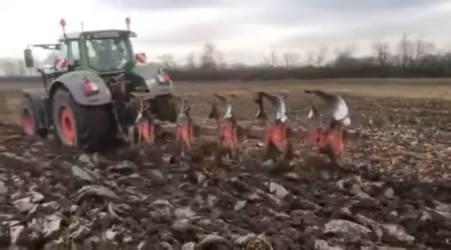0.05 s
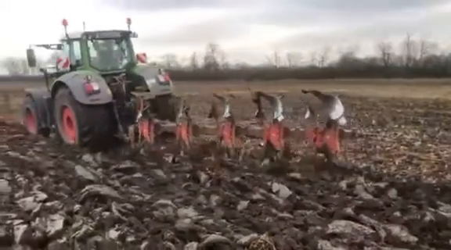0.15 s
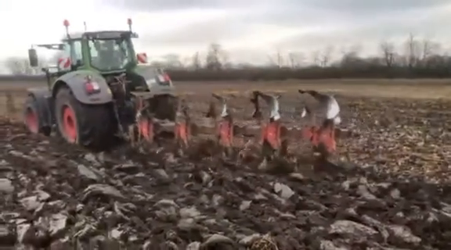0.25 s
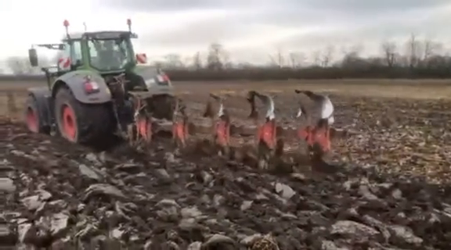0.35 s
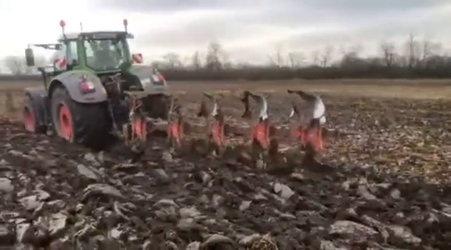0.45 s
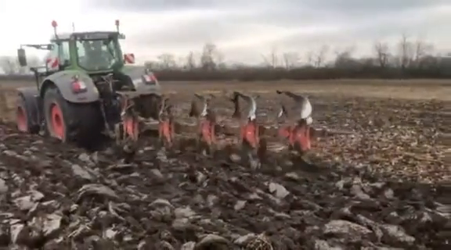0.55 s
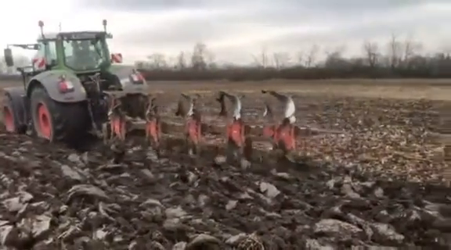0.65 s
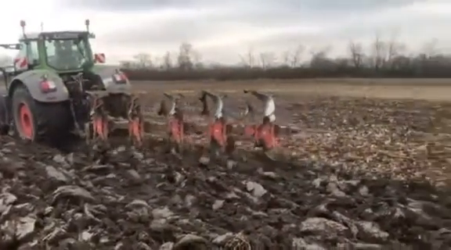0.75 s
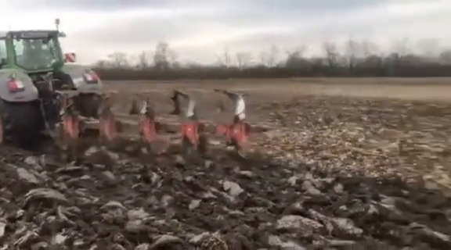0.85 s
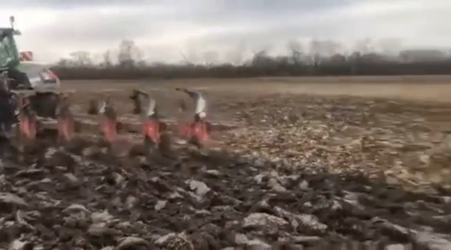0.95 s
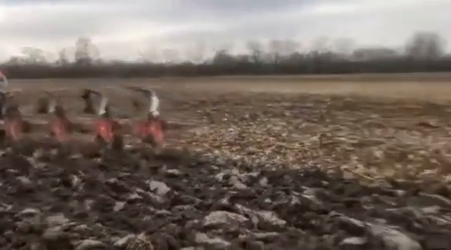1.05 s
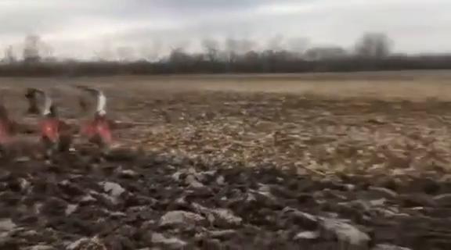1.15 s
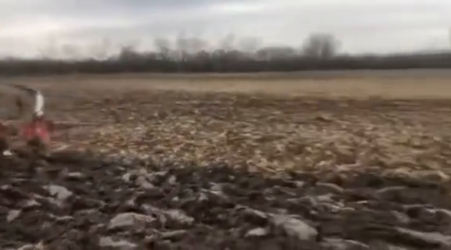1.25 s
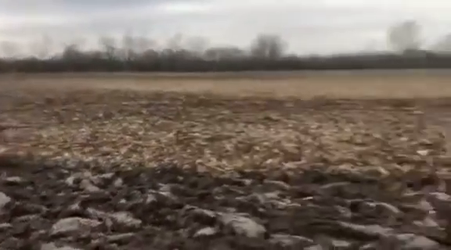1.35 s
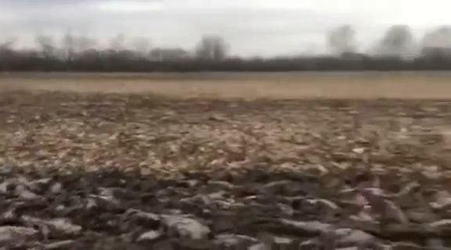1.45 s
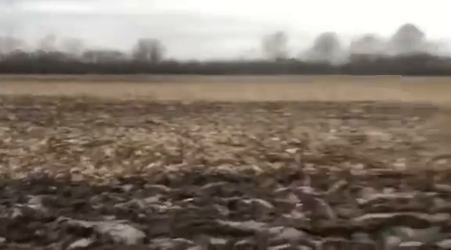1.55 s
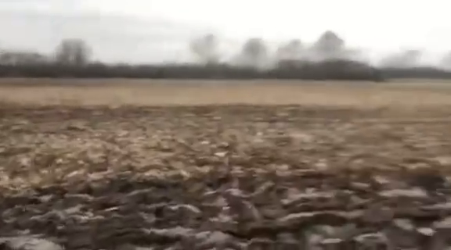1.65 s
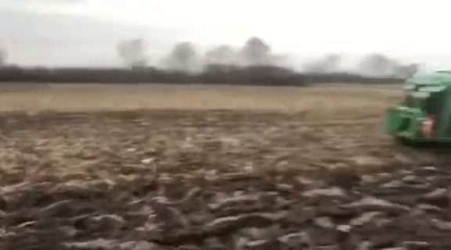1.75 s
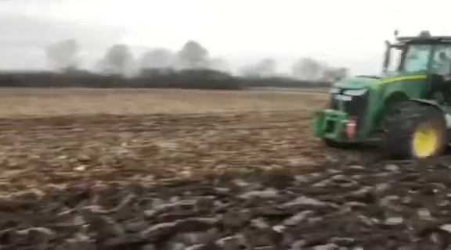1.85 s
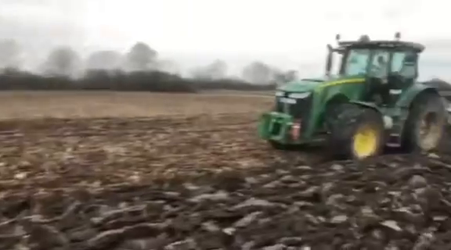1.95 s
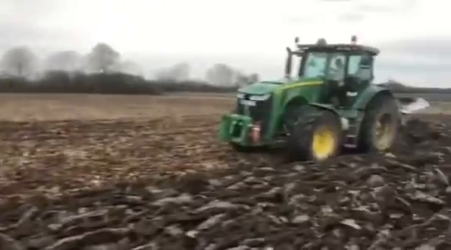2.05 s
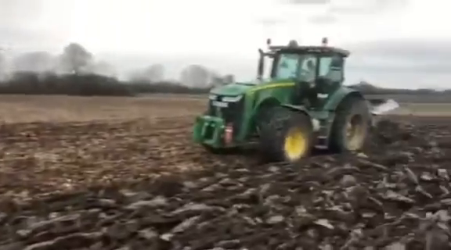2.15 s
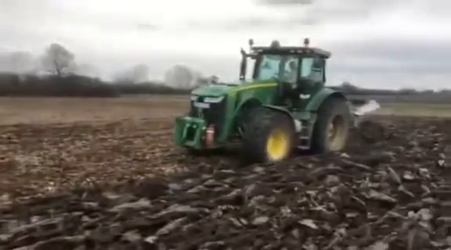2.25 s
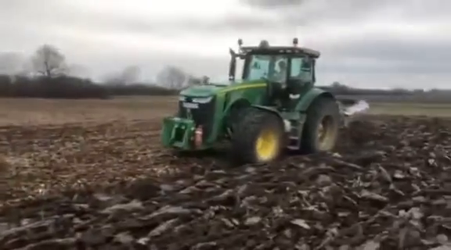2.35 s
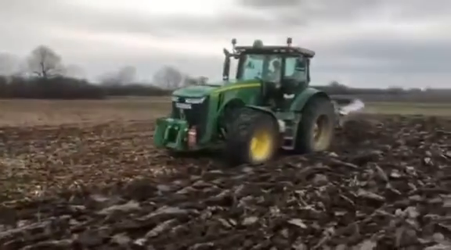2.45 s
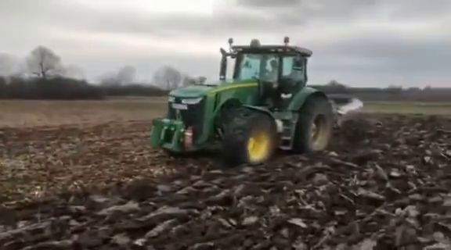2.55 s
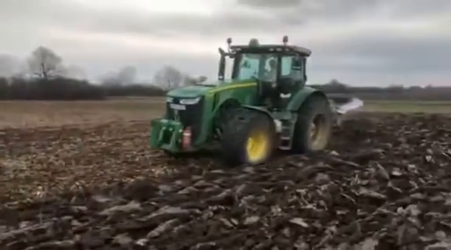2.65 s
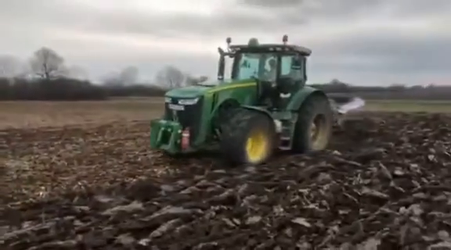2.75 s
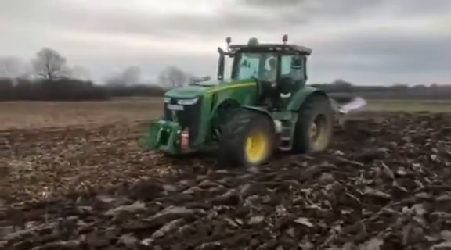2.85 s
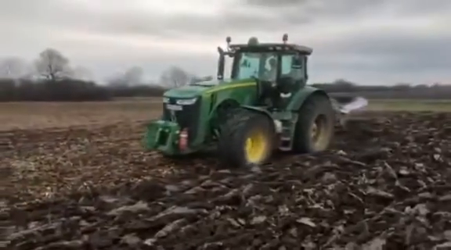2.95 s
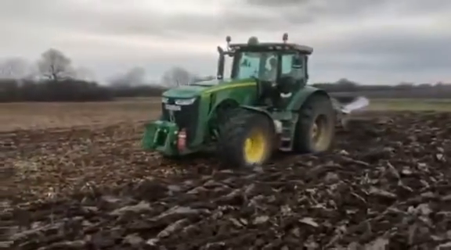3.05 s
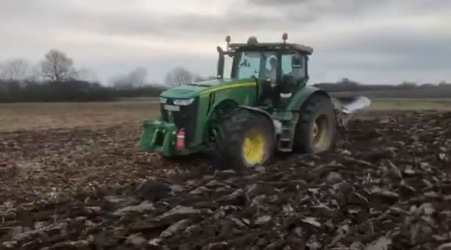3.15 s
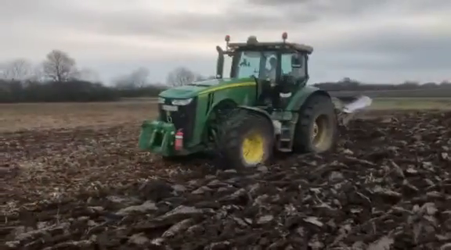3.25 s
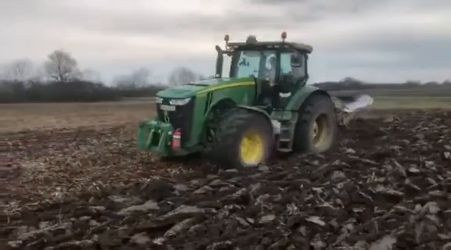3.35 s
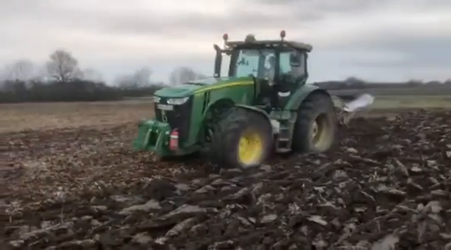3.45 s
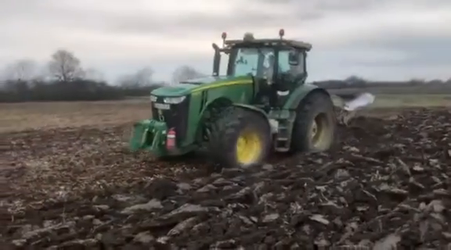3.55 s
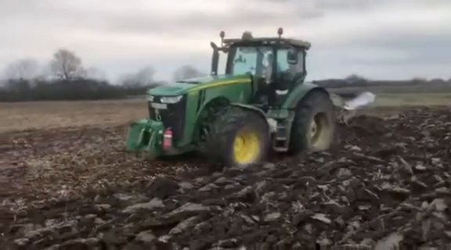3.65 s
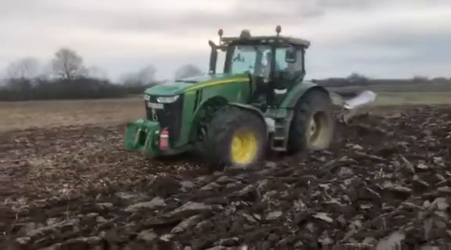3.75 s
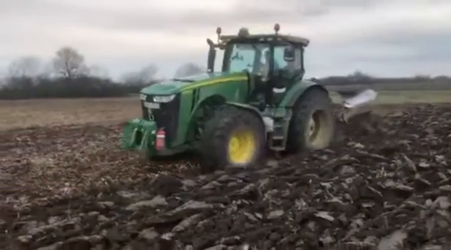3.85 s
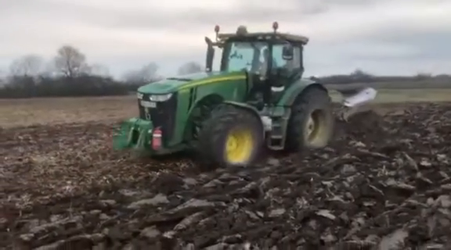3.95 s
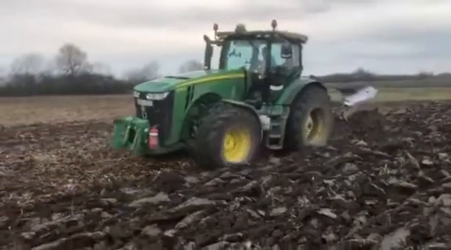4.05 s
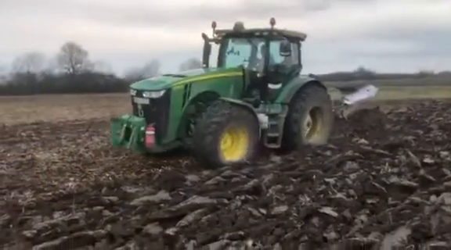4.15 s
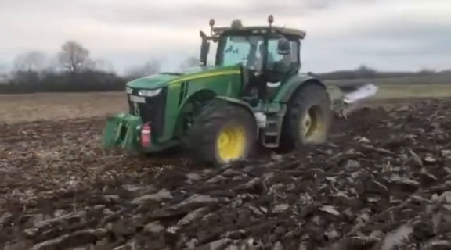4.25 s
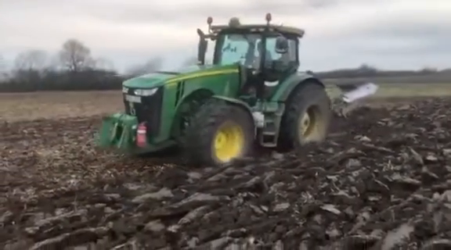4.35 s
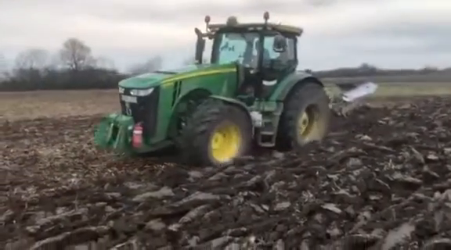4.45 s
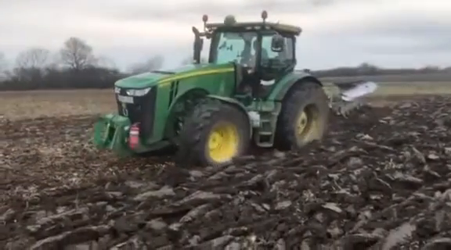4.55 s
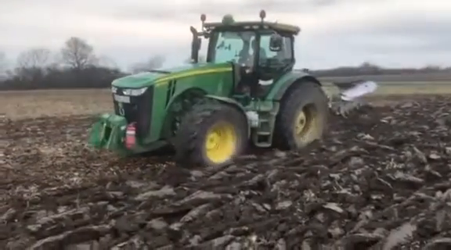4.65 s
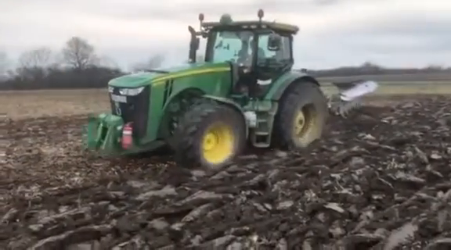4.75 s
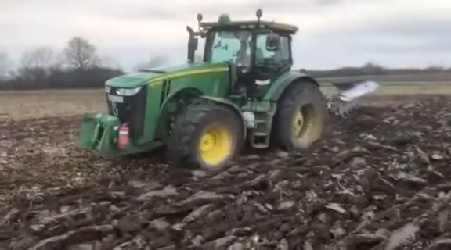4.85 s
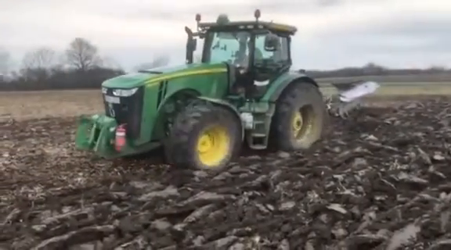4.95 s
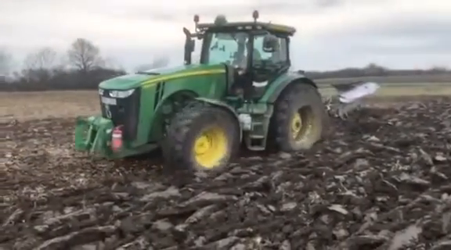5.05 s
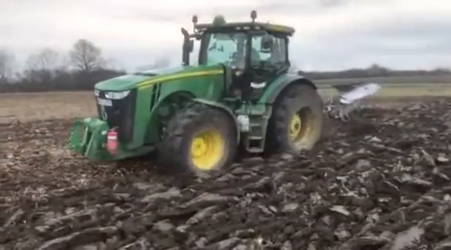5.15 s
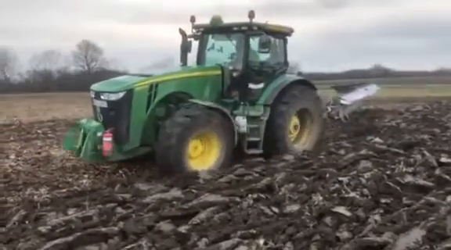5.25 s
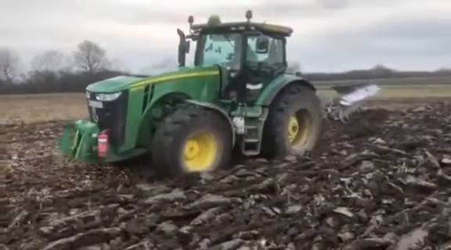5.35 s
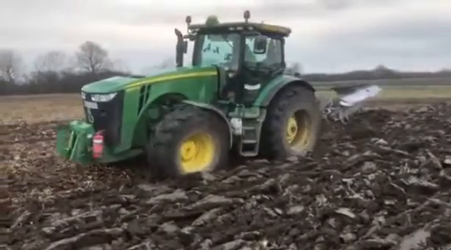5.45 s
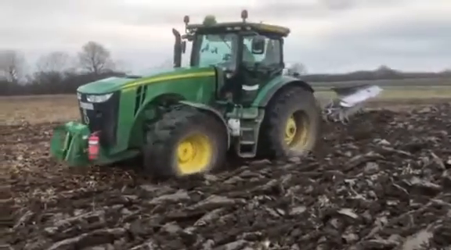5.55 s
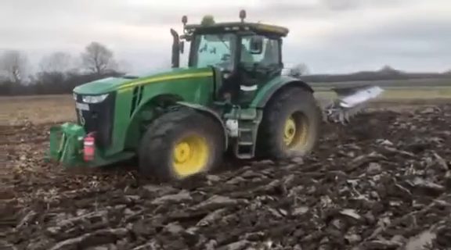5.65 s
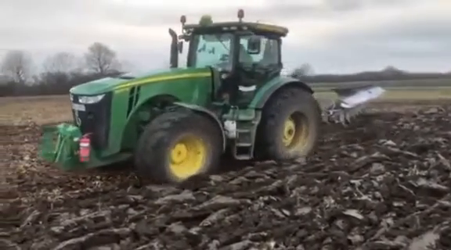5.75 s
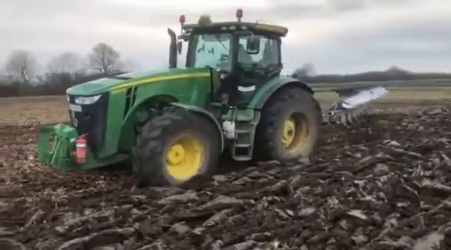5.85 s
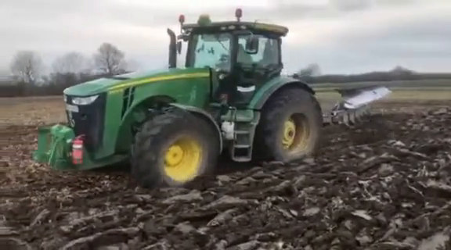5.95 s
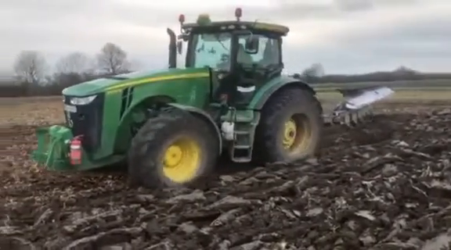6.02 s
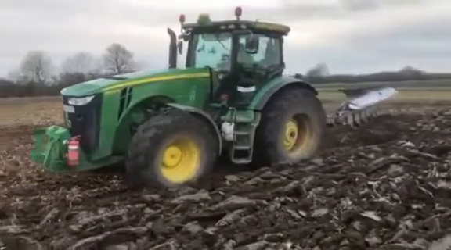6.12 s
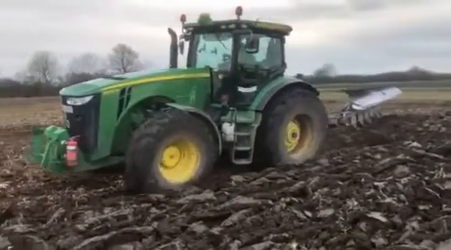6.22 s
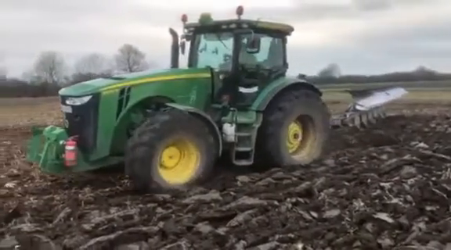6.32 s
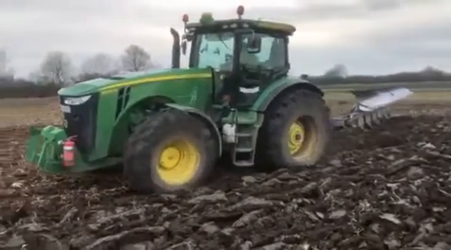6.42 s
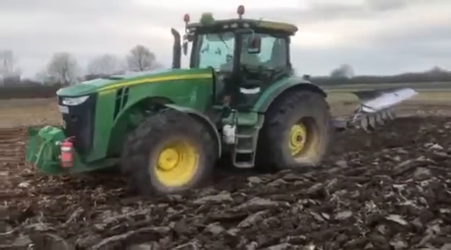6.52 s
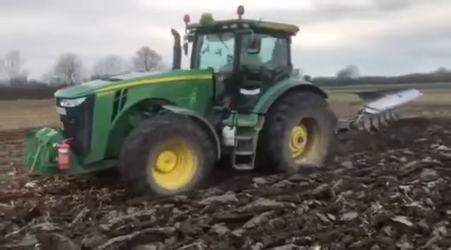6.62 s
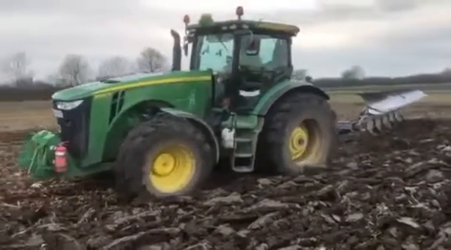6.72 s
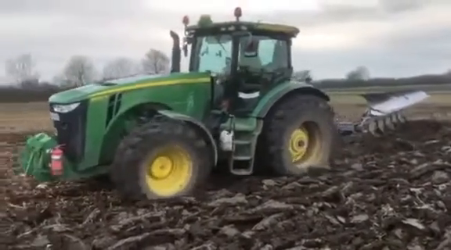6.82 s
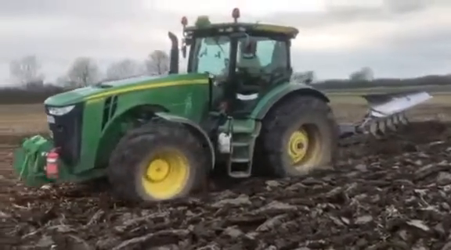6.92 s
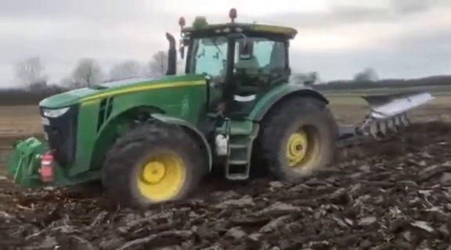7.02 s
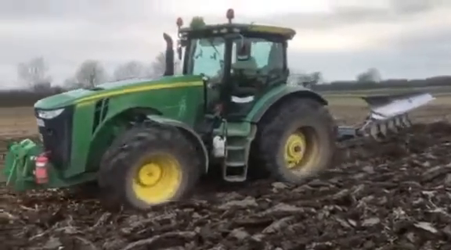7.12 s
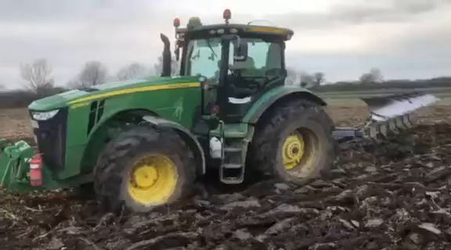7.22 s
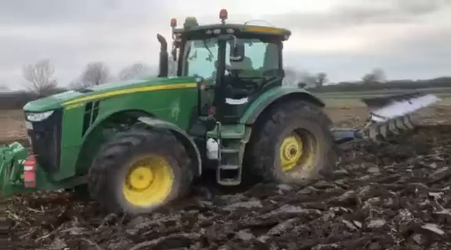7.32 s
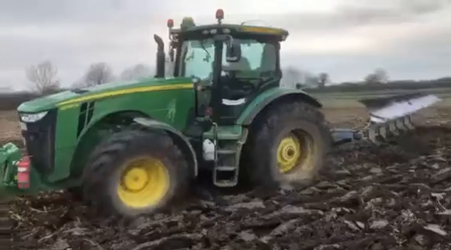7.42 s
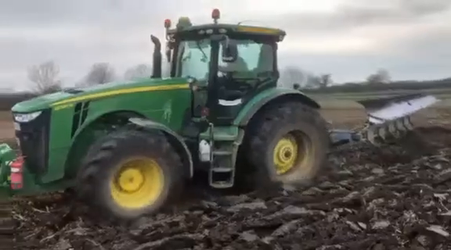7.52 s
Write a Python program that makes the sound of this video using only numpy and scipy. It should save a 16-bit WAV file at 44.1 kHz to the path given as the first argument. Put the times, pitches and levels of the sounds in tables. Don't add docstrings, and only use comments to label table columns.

```python
import sys
import numpy as np
from scipy import signal
from scipy.fft import rfft, irfft, next_fast_len
from scipy.io import wavfile
from scipy.ndimage import uniform_filter1d

SR = 44100
rng = np.random.default_rng(int(sys.argv[2]) if len(sys.argv) > 2 else 0)


def persist_wave(psi):
    counts = np.round(np.clip(psi, -1, 1) * 32767).astype(np.int16)
    wavfile.write(sys.argv[1], SR, np.atleast_2d(counts).T)


def volts_from_db(level):
    exponent = np.asarray(level, float) / 20
    return 10 ** exponent


N = 334278
TIME = np.arange(N) / SR


def curves(table):
    t, *columns = np.transpose(table)
    return [np.interp(TIME, t, c) for c in columns]


def walk(rate_hz):
    k = int(SR / rate_hz)
    held = np.repeat(rng.standard_normal(N // k + 1), k)
    return 1.16 * uniform_filter1d(uniform_filter1d(held, k), k)[:N]


def turns(hz):
    return np.cumsum(hz) / SR


def tone(revs, wander_db, rate_hz):
    return np.sqrt(2) * np.sin(2 * np.pi * (revs + rng.random())) * volts_from_db(wander_db * walk(rate_hz))


def swells(rows):
    return np.sqrt(sum(volts_from_db(2 * db) * np.exp(-((TIME - t) / half_s) ** 2) for t, half_s, db in rows))


def noise(spectrum, drift_db, count, peaks=()):
    hz, db = np.transpose(spectrum)
    size = next_fast_len(N)
    every_hz = np.maximum(np.fft.rfftfreq(size, 1 / SR), 1)
    place = np.log(every_hz)
    colour_db = np.interp(place, np.log(hz), db, -120, -120)
    for f, width_hz, peak_db in peaks:
        colour_db += peak_db / (1 + (2 * (every_hz - f) / width_hz) ** 2)
    shaped = rfft(rng.standard_normal(size)) * volts_from_db(colour_db)
    centres = np.linspace(np.log(hz[1]), np.log(hz[-3]), count)
    out = np.zeros(N)
    for one in np.eye(count):
        part = irfft(shaped * np.interp(place, centres, one), size)[:N]
        out += part * volts_from_db(drift_db * walk(1.587))
    return out / np.std(out)


# multiple of its shaft rate, level/dB
FAR_ORDERS = [(1.5, -45), (2, -44), (3, -47.5), (6, -42), (7, -52), (8, -50), (38, -51.5), (45.5, -56.5)]
# t/s, f/Hz, level/dB
FAR_FADE = [(0, 41.46, -2), (1.5, 40.82, -1), (3, 40.83, -4), (7.58, 40.7, -7.5)]


def far_tractor():
    hz, db = curves(FAR_FADE)
    return volts_from_db(db) * sum(volts_from_db(d) * tone(k * turns(hz), 1.4, 4) for k, d in FAR_ORDERS)


# f/Hz, level/dB per Hz
RUMBLE = [(12, -59.5), (20, -37.5), (70, -5), (113, -8), (135, -5), (180, -25), (300, -120)]


def ground_rumble():
    return volts_from_db(-40.5) * noise(RUMBLE, 1.2, count=4)


# t/s, f/Hz, level/dB
HUM = [(0.0, 145.7, -37), (0.06, 146.7, -32), (0.74, 144.7, -36.5), (1.35, 144.6, -35.5),
       (1.83, 148.9, -29), (2.49, 148.9, -27.5), (2.7, 146.5, -32.5), (2.83, 141.9, -34.5),
       (3.34, 142.0, -33.5), (3.46, 146.2, -31.5), (3.74, 157.0, -22), (4.41, 154.3, -24),
       (4.71, 146.8, -28), (5.25, 151.2, -25.5), (5.87, 151.7, -24.5), (6.33, 148.5, -27),
       (7.01, 150.4, -24), (7.58, 148.6, -22.5)]


def drive_hum():
    hz, db = curves(HUM)
    octave_db = -41 + 1.14 * (db + 25) + 0.6 * (hz - 150.7)
    hum = volts_from_db(db) * tone(turns(hz) + 0.017 * walk(25), 1.3, 10)
    return hum + volts_from_db(octave_db) * tone(2 * turns(hz), 2.2, 12)


# t/s, f/Hz
CRANK = [(0, 503.8), (3.3, 503.5), (3.8, 510.7), (6.0, 509.2), (6.8, 503.2), (7.1, 507.7), (7.58, 505.5)]


def crank_teeth():
    return turns(curves(CRANK)[0])


def engine_cycle():
    return crank_teeth() / 32.7


def facing():
    start_s, takes_s = 0.85, 0.75
    return np.sin(np.pi / 2 * np.clip((TIME - start_s) / takes_s, 0, 1)) ** 2


def turning(ahead, behind):
    return np.sqrt(facing()) * ahead + np.sqrt(1 - facing()) * behind


# t/s, level/dB
NEAR = [(0, -34.5), (.8, -33), (1.35, -31.5), (1.9, -28), (2.45, -26), (2.68, -26.5), (2.8, -29),
        (3.4, -28.5), (3.75, -27.5), (4.35, -26), (4.85, -27.5), (5.6, -26), (6.45, -26), (6.75, -25.5),
        (7.58, -25.5)]


def layer_db(mix):
    close_db, slope, behind_db = mix
    nearness_db = curves(NEAR)[0] + 26
    return close_db + slope * nearness_db + behind_db * (1 - facing())


CYLINDERS = np.array([1, -8.0, -4, -8.5, -5.5, -9])


def knock(depth, lag):
    firing = len(CYLINDERS) * (engine_cycle() + lag)
    k = firing.astype(int)
    luck_db = 4.3 * rng.standard_normal(k[-1] + 1)[k]
    size = volts_from_db(np.take(CYLINDERS, k % len(CYLINDERS)) + luck_db)
    gate = 1 + depth * size * np.exp(-(firing - k) / 1.3)
    return gate / np.sqrt(np.mean(gate ** 2))


# close level/dB, dB per dB of nearness, dB behind the phone
GEAR_MIX = (-39.5, 0.25, 0)


def crank_gear():
    return volts_from_db(layer_db(GEAR_MIX)) * tone(crank_teeth(), 2.4, 12)


# f/Hz, level/dB per Hz
BOOM = [(100, -38), (175, -3.5), (212, 0), (243, -11), (296, -6.5), (330, -15), (430, -39), (730, -120)]
# close level/dB, dB per dB of nearness, dB behind the phone
BOOM_MIX = (-33, 0.55, 0)


def boom():
    return volts_from_db(layer_db(BOOM_MIX) + 1.6 * walk(9)) * noise(BOOM, 0.9, count=4)


# f/Hz, level/dB per Hz
ROAR_BEHIND = [(190, -31), (320, -2.5), (440, -2.5), (540, -1.5), (640, -5), (780, -2.5), (1020, -5.5),
               (1350, -11), (1760, -37), (2970, -120)]
# f/Hz, level/dB per Hz
ROAR = [(190, -36), (320, -4.5), (415, -6), (454, -7), (471, -5), (509, -4), (537, -5.5), (675, -1.5),
        (1040, -4.5), (1200, -6.5), (1350, -15), (1760, -38), (2970, -120)]
# multiple of the four-stroke cycle, level/dB under the roar
ORDERS = [(3, -26), (6, -20), (11.04, -8), (11.99, -15), (14.96, -17), (24.05, -18), (50.9, -14),
          (56.4, -16.5), (69.3, -21), (73.3, -21), (58.47, -16.5), (28.88, -20.5), (37.13, -19.5)]
# close level/dB, dB per dB of nearness, dB behind the phone
ROAR_MIX = (-27.5, .8, 0)


def roar():
    cycle = engine_cycle()
    orders = sum(volts_from_db(db) * tone(k * (cycle + 0.003 * walk(6)), 1.5 + 0.016 * k, 9) for k, db in ORDERS)
    rough = turning(noise(ROAR, 1.0, count=8), noise(ROAR_BEHIND, 0.53, count=3))
    rough = volts_from_db(-1.0) * rough * knock(0.4, 0.1)
    return volts_from_db(layer_db(ROAR_MIX)) * (orders * np.sqrt(facing()) + rough)


# f/Hz, level/dB per Hz
CLATTER_BEHIND = [(760, -43), (1300, -10.5), (1550, -1.5), (1970, -7), (2220, -3), (2520, -8),
                  (2600, -10.5), (3300, -18), (4290, -52), (7260, -120)]
# f/Hz, level/dB per Hz
CLATTER = [(760, -24), (1300, -1), (1800, -1), (2200, -3), (2440, -4), (2940, -7.5), (3300, -12),
           (4290, -31), (7260, -120)]
# f/Hz, width/Hz, level/dB
CLATTER_PEAKS = [(1557, 90, 4), (1857, 83, 2.5), (2435, 130, 3), (2166, 97, -2)]
# close level/dB, dB per dB of nearness, dB behind the phone
CLATTER_MIX = (-32, 0.95, 0)


def clatter():
    strain_s, strain_half_s, strain_db = 2.56, 0.17, 2.0
    db = layer_db(CLATTER_MIX) + strain_db * np.exp(-((TIME - strain_s) / strain_half_s) ** 4)
    ahead = noise(CLATTER, 1.34, count=9, peaks=CLATTER_PEAKS)
    return volts_from_db(db) * turning(ahead, noise(CLATTER_BEHIND, 1.3, count=4)) * knock(0.34, 0.4)


# f/Hz, level/dB per Hz
HISS_BEHIND = [(1880, -35.5), (3200, -7), (3730, -6), (4060, -1), (4210, -4.5), (4800, -5.5), (5760, -5),
               (6140, -9), (7400, -12.5), (8260, -14), (8800, -16), (11400, -43), (19400, -120)]
# f/Hz, level/dB per Hz
HISS = [(1880, -34), (3200, -6.5), (4140, -3.5), (4530, -1), (5180, -2.5), (5670, 1), (8050, -6.5),
        (8800, -7.5), (11400, -38.5), (19400, -120)]
# f/Hz, width/Hz, level/dB
HISS_PEAKS = [(4560, 87, 2), (5615, 310, 2), (6070, 300, -2)]
# close level/dB, dB per dB of nearness, dB behind the phone
HISS_MIX = (-30, 0.92, -6)


def air_hiss():
    ahead = noise(HISS, 0.69, count=10, peaks=HISS_PEAKS)
    hiss = turning(ahead, noise(HISS_BEHIND, 0.45, count=4))
    return volts_from_db(layer_db(HISS_MIX)) * hiss * knock(0.22, 0.7)


# middle t/s, half length/s, level/dB
WHISTLE = [(1.3, .45, -60)]


def turbo_whistle():
    return swells(WHISTLE) * tone(7060 * TIME, 2.0, 13)


# t/s, peak level/dB, f/Hz
THUDS = [
    (1.247, -24.5, 231),
    (1.879, -34.5, 188),
    (2.699, -28, 213.4),
    (4.127, -27, 203.5),
    (4.379, -24, 179.9),
    (5.079, -33, 179.4),
    (5.498, -23.5, 191.5),
]


def clods():
    out = np.zeros(N)
    for t, db, hz in THUDS:
        bump = np.exp(-((TIME - t - 0.04) / 0.023) ** 2)
        out += volts_from_db(db) * bump * np.sin(2 * np.pi * hz * TIME)
    return out


# t/s, upper mesh f/Hz
GEARBOX = [(0, 1184), (2, 1225), (3.2, 1196), (3.75, 1246), (4.4, 1218), (4.72, 1168), (5, 1201),
           (5.6, 1235), (6.2, 1199), (6.6, 1203), (7.15, 1217), (7.58, 1176)]
# t/s, lower mesh f/Hz
AXLE = [(0, 672), (3.3, 668.7), (3.75, 687), (4.1, 679.5), (4.45, 676), (4.56, 650), (5.0, 672.7),
        (5.8, 680), (6.2, 670), (7.2, 674.3), (7.58, 656)]
MESH_RATIO = 1, .802, 1, 1.106
# middle t/s, half length/s, level/dB
WHINES = [
    [(3.85, 0.13, -34.5), (4.4, .35, -37), (5.6, 0.24, -39), (6.5, .4, -39), (7.2, .25, -40)],
    [(4.3, 0.21, -43), (5.45, .4, -38), (7.1, .5, -46)],
    [(2.1, 0.36, -43), (3.75, 0.16, -34), (4.28, .18, -34), (4.82, .24, -32), (5.9, .15, -35.5),
     (6.8, 0.28, -36), (7.35, 0.23, -30.5)],
    [(1.8, 0.46, -41), (3.1, .5, -40), (4.7, .15, -38), (6.1, 0.25, -38), (6.9, .35, -35.5)],
]


def gear_whines():
    box, axle = [turns(curves(speed)[0] * (1 + 0.0017 * walk(15))) for speed in (GEARBOX, AXLE)]
    out = np.zeros(N)
    for ratio, shaft, rows in zip(MESH_RATIO, (box, box, axle, axle), WHINES):
        out += swells(rows) * tone(ratio * shaft, 1.5, 16)
    return out


def scene():
    engine = crank_gear() + boom() + roar() + clatter() + air_hiss()
    far = far_tractor() + ground_rumble() + turbo_whistle()
    return np.tile(far + drive_hum() + engine + clods() + gear_whines(), (2, 1))


# f/Hz, step level/dB over the local level
STEP = [(300, -13.5), (1500, -4), (3000, 3), (5500, 3), (7000, 6.5), (8700, 8.5), (9050, 11.5), (9350, 12)]


def thin_treble(x, hop=1412):
    n = np.arange(2 * hop) + 0.5
    hz = n[:hop] * SR / (2 * hop)
    used = hz < 9330
    window = np.sin(np.pi * n / (2 * hop))[:, None]
    basis = window * np.cos(np.pi / hop * np.outer(n + hop / 2, n[:hop][used]))
    halves = np.pad(x, (hop, 2 * hop - N % hop), mode="reflect").reshape(-1, hop)
    lines = np.hstack([halves[:-1], halves[1:]]) @ basis
    around = uniform_filter1d(uniform_filter1d(lines ** 2, size=71, axis=1), size=7, axis=0)
    band = np.arange(used.sum()) // 12
    extra_db = 1.8 * rng.standard_normal((len(lines), band[-1] + 1))[:, band]
    extra_db += 0.8 * rng.standard_normal((len(lines), 1)) * np.clip(hz[used] / 8000, 0, 1)
    step_db = np.interp(hz[used], *np.transpose(STEP)) + np.minimum(extra_db, 2.5)
    step = np.sqrt(around) * volts_from_db(step_db)
    rounded = np.sign(lines) * np.floor(np.abs(lines) / step + 0.4) * step
    frames = rounded @ basis.T * 2 / hop
    return (frames[1:, :hop] + frames[:-1, hop:]).ravel()[:N]


def top_cut(x):
    return signal.sosfilt(signal.butter(12, 10010, fs=SR, output="sos"), x)


WIDE_MOMENT = 6.335, 0.02, -35.5


def record(dry):
    mono = thin_treble(dry[0])
    t, half_s, db = WIDE_MOMENT
    treble = noise([(4500, -60), (4650, 0), (6350, -2), (6450, -40), (6800, -40), (6900, -6),
                    (8300, -9), (8400, -60), (9000, -90)], 0, count=2)
    side = volts_from_db(db) * treble * np.cos(np.pi / 2 * np.clip((TIME - t) / half_s, -1, 1))
    return top_cut(np.array([mono + side, mono - side]))


dry = scene()
out = record(dry)
persist_wave(out)
```